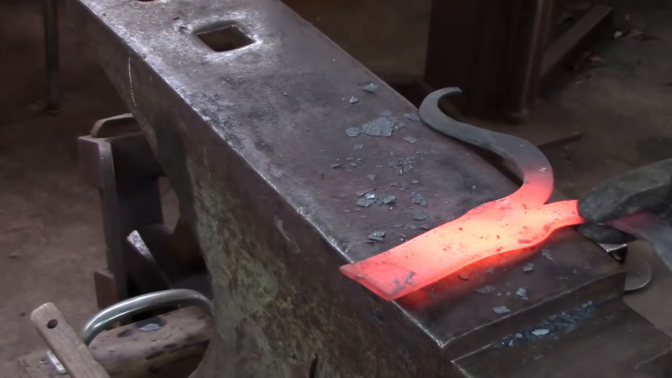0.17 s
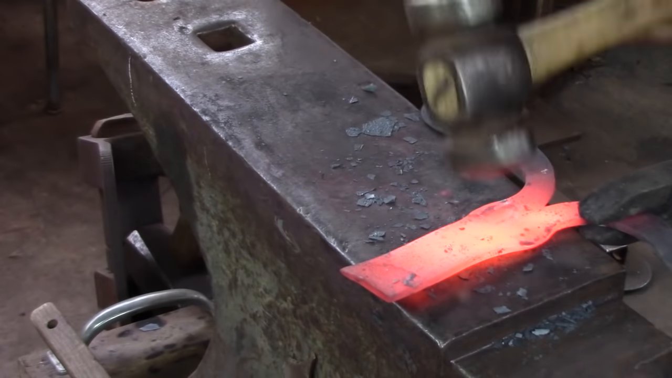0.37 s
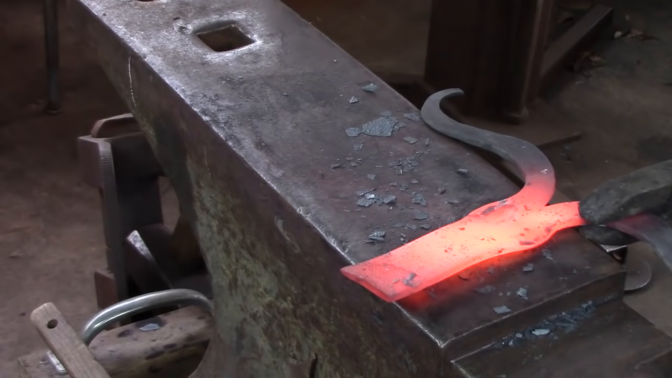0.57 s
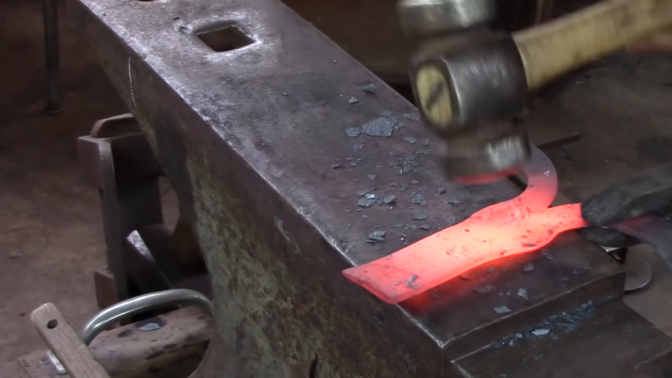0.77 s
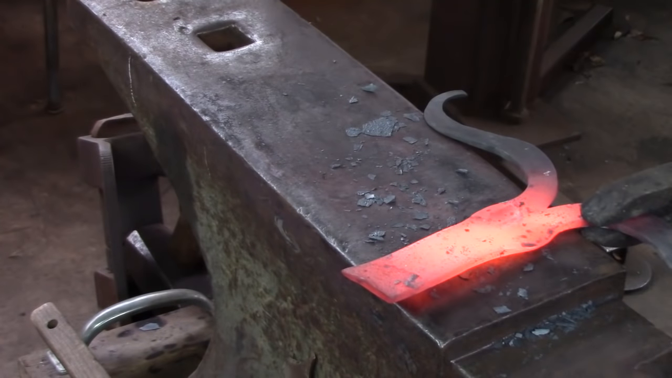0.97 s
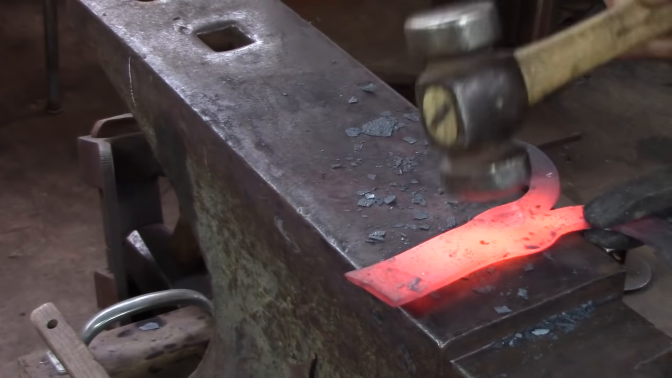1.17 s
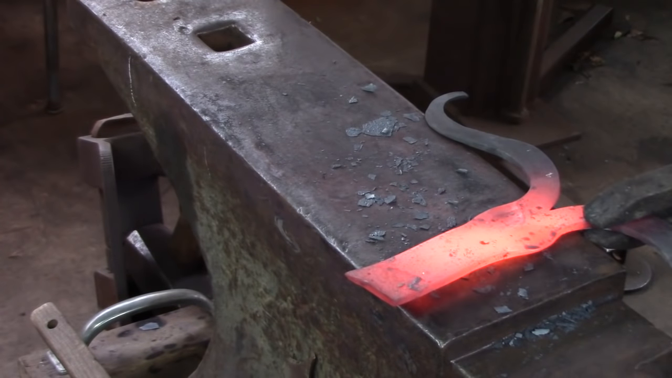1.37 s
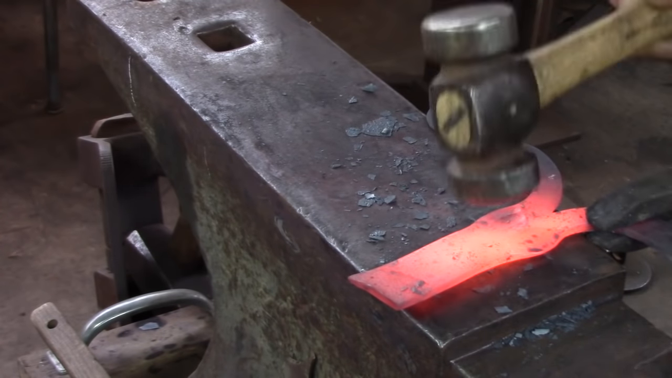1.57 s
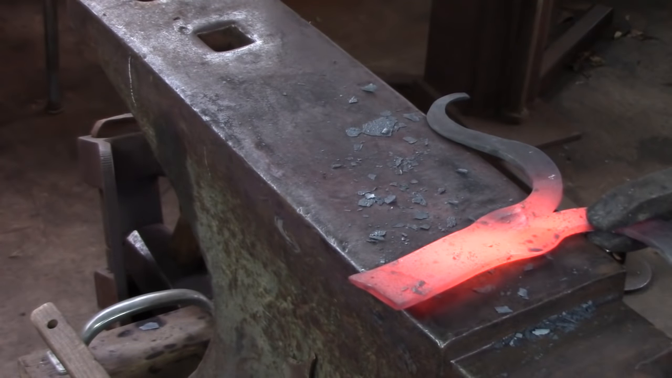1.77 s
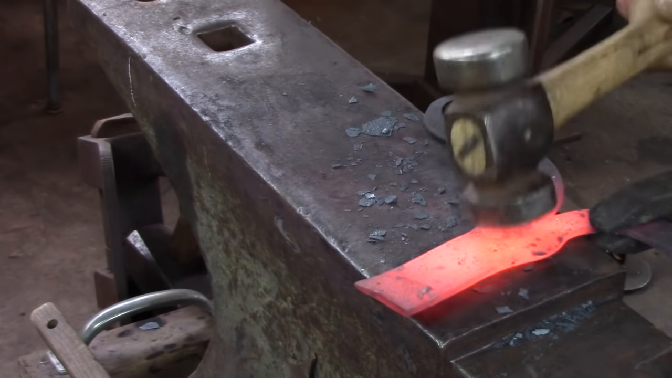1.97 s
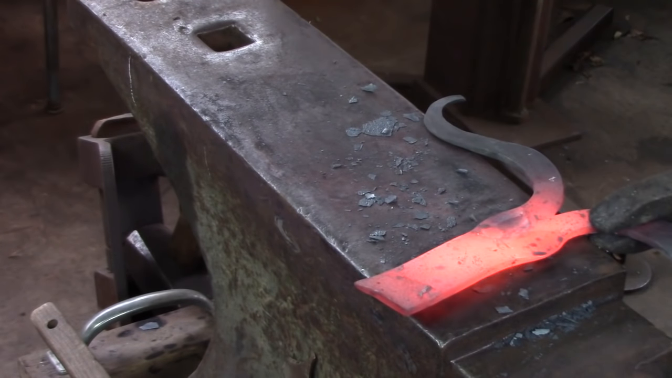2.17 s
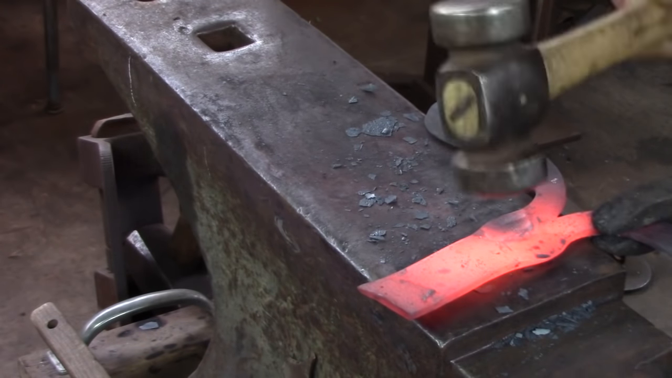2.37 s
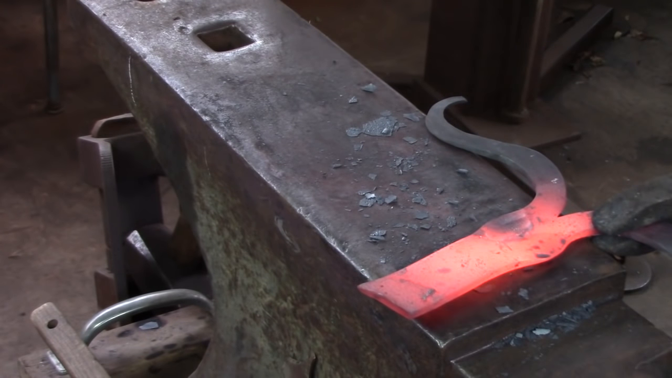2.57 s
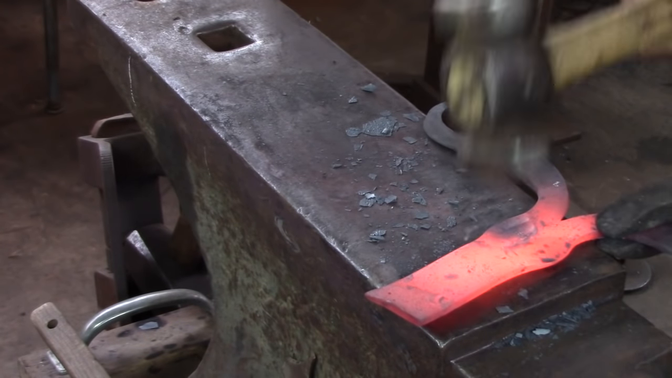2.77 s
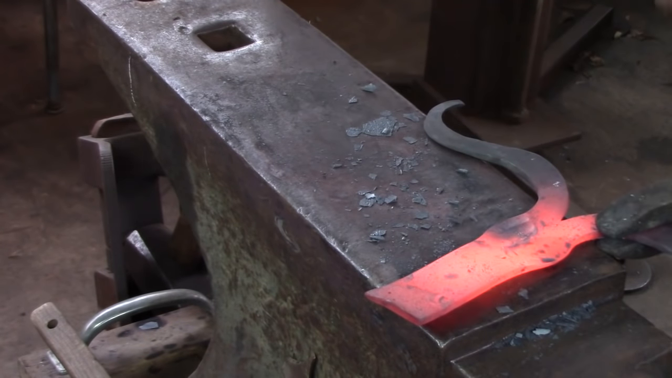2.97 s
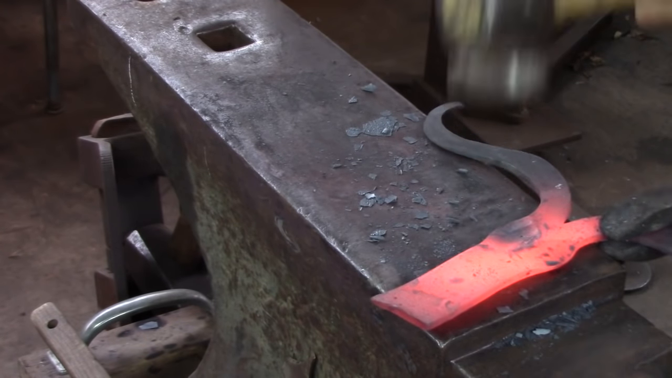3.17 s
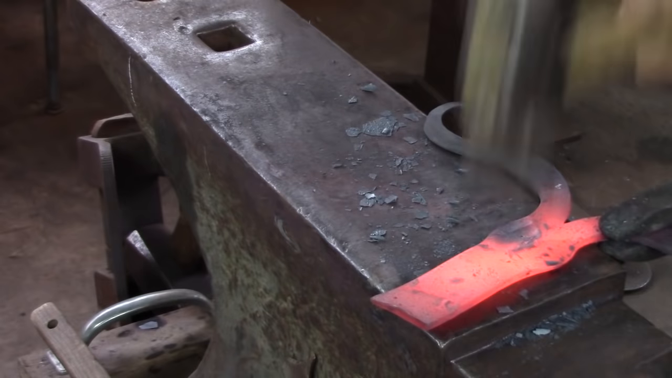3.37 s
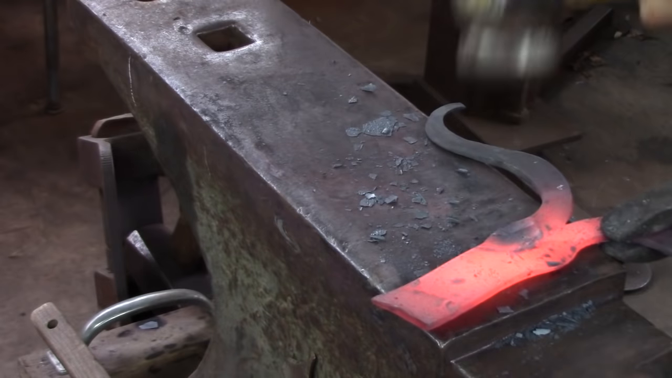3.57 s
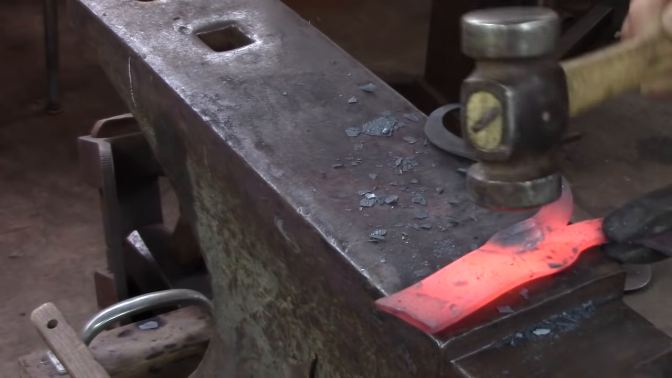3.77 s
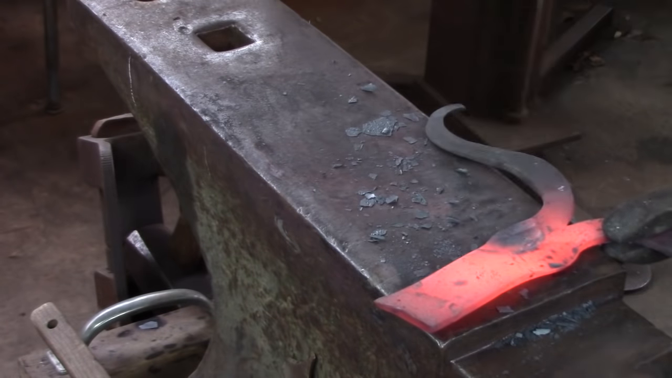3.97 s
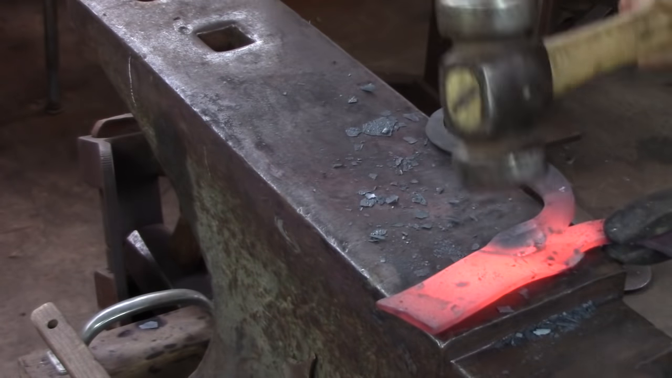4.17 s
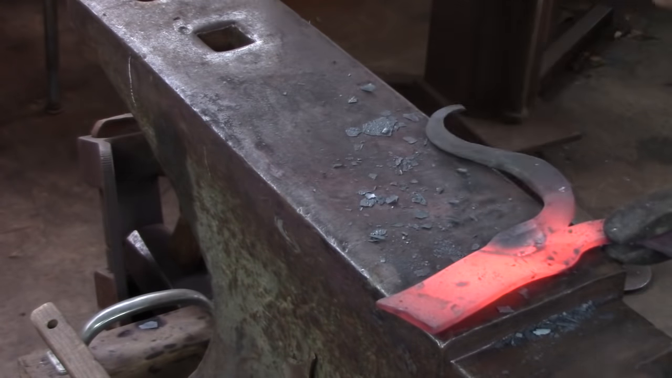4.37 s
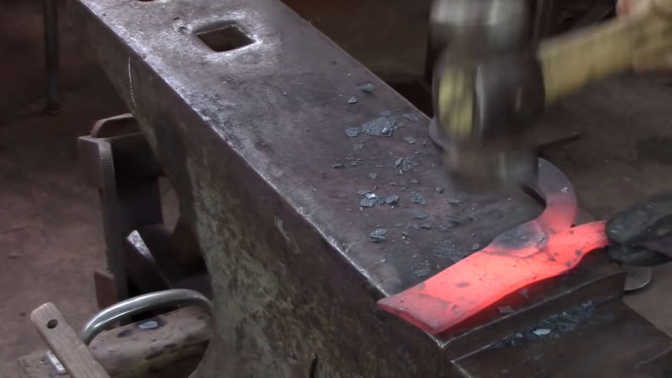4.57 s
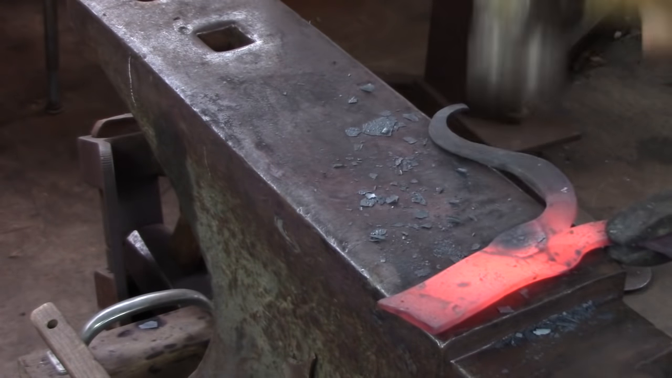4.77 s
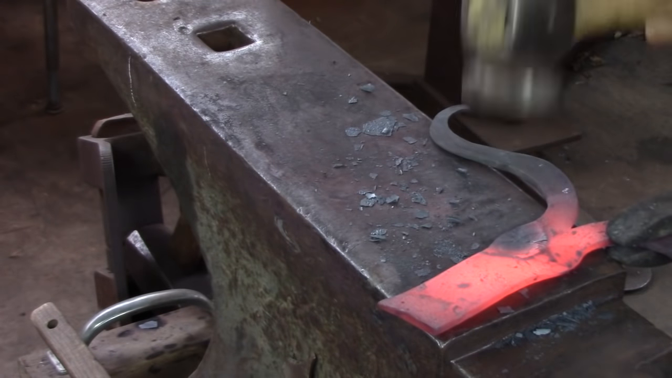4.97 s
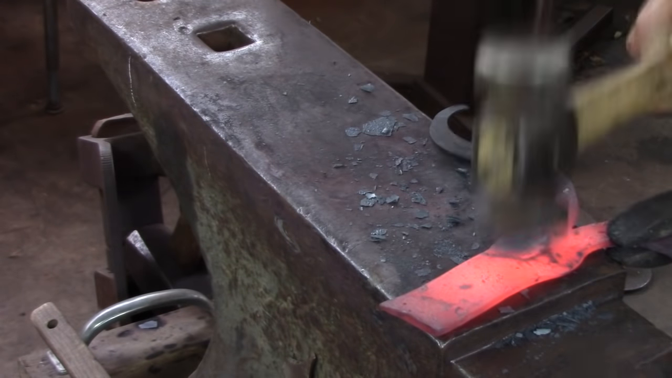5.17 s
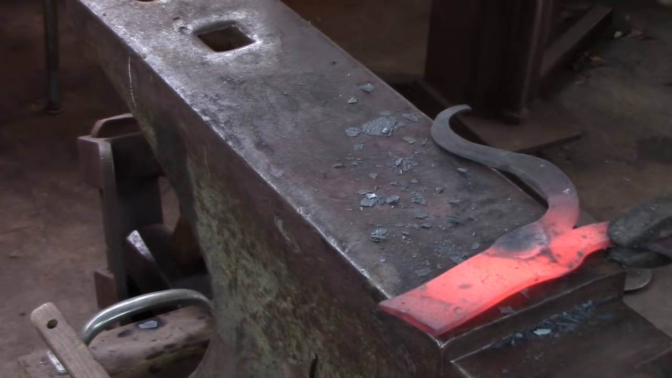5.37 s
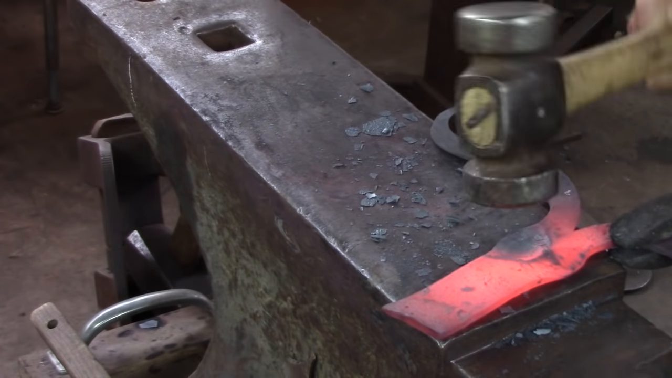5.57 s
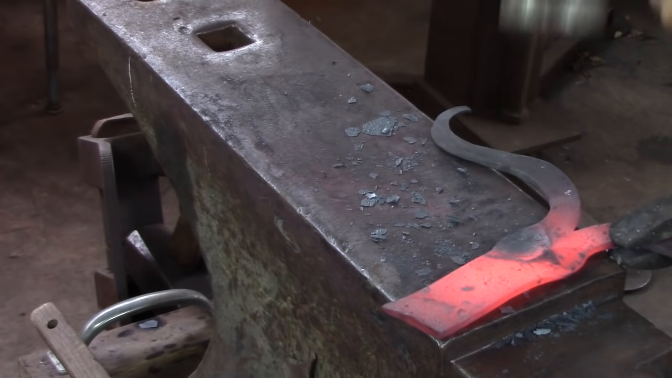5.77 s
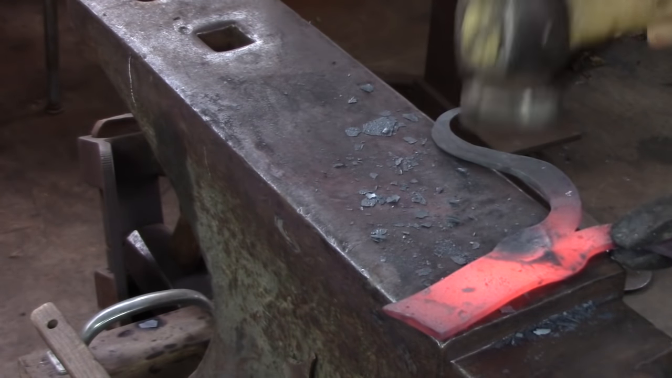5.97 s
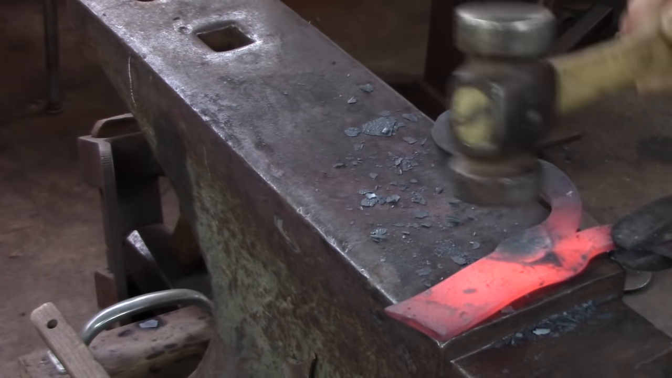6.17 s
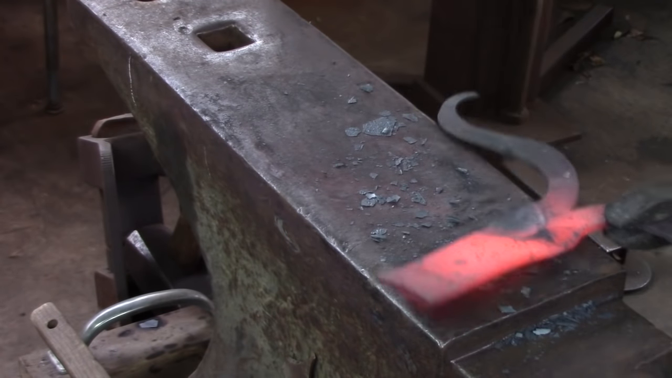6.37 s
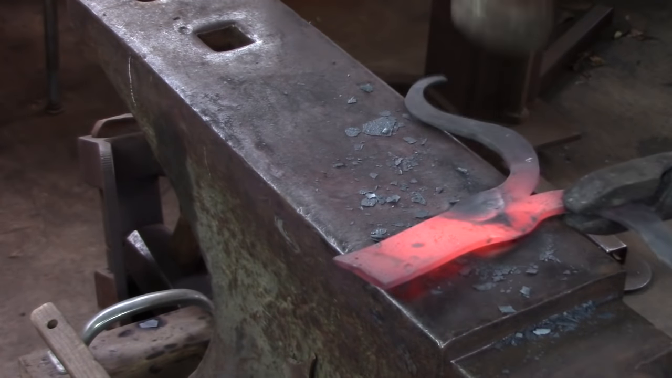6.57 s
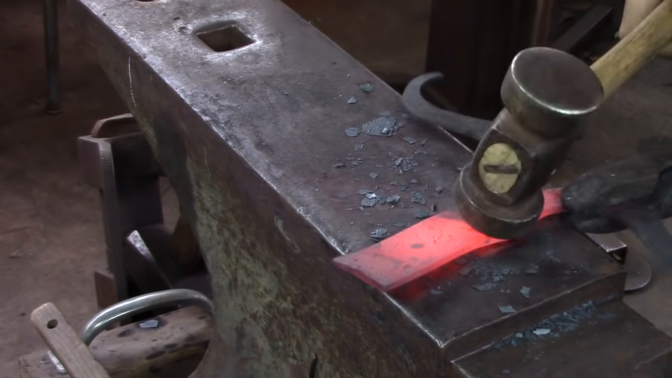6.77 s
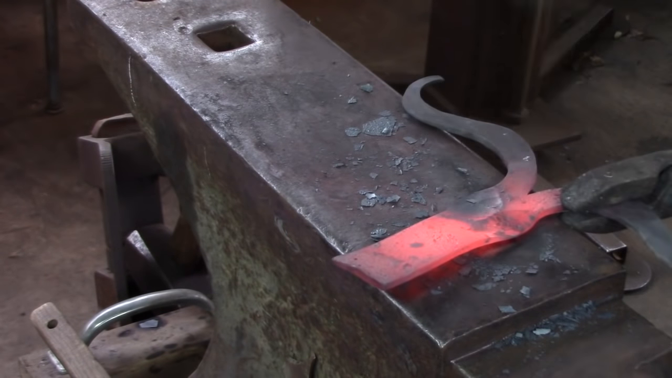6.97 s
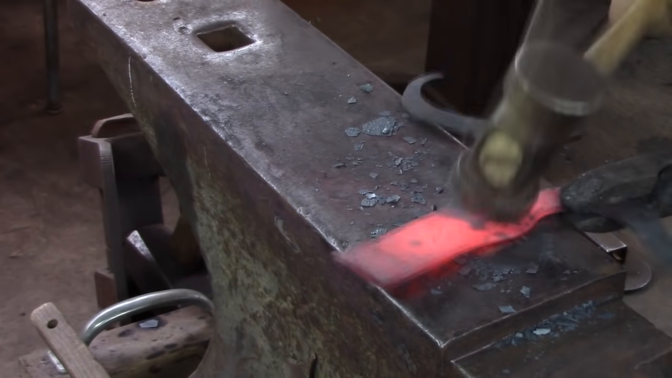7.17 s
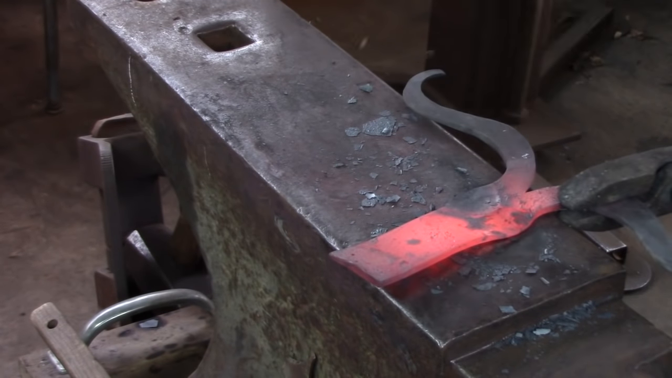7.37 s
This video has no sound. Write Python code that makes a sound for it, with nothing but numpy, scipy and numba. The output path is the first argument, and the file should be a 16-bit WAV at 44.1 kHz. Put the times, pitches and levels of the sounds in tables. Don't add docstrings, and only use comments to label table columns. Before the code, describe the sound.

Seventeen even metallic blows, slightly quickening, ring out from an anvil: sharp crack, damped clank, glassy high whine from the hammer head, and a short room echo. Then the beat breaks off; a faint gritty drag, a bright knock and a tiny creak follow, then a last strike. The microphone is close, the loud hits squashed and slightly clipped, over a very quiet, low room noise.

```python
import sys
import numpy as np
from scipy import signal
from scipy.fft import rfft, irfft
from scipy.io import wavfile
from numba import njit

SR = 44100
rng = np.random.default_rng(int(sys.argv[2]) if len(sys.argv) > 2 else 0)


def put_to_file(sound):
    columns = np.atleast_2d(sound).T
    safe = np.clip(columns, -1, 1)
    whole_steps = np.round(safe * 32767)
    wavfile.write(sys.argv[1], SR, whole_steps.astype(np.int16))


def amplitude_ratio(level_db):
    exponent = np.asarray(level_db, float) / 20
    return 10 ** exponent


N = 327663
LEAD = SR // 2
USUAL_LOW_DB, USUAL_MIDDLE_DB = -43, -45


def rms_one(x):
    return x / np.sqrt(np.mean(x ** 2) + 1e-20)


def at_hz(points, hz):
    curve_hz, value = np.transpose(points)
    return np.interp(np.log(hz + 1), np.log(curve_hz), value)


def dying_sine(t, hz, t60):
    return np.sin(2 * np.pi * hz * t) * amplitude_ratio(-60 * t / t60)


def add(out, s, sound):
    i = LEAD + round(s * SR)
    out[i:i + len(sound)] += sound[:len(out) - i]


def causal_pulse(spectrum, size):
    hz = np.fft.rfftfreq(size, 1 / SR)
    cepstrum = irfft(np.log(amplitude_ratio(at_hz(spectrum, hz))), size)
    cepstrum[1:size // 2] *= 2
    cepstrum[size // 2 + 1:] = 0
    return rms_one(irfft(np.exp(rfft(cepstrum)), size)) / np.sqrt(size)


def workshop_floor():
    # pitch_hz [Hz], density_db [dB per Hz]
    floor_curve = [(40, -29), (120, -4), (250, -7.5), (500, -3), (900, -1.5), (2000, -8.5), (4000, -15.5),
                   (8000, -23), (11500, -27.5), (16000, -43.5)]
    density_db = at_hz(floor_curve, np.fft.rfftfreq(N, 1 / SR))
    noise = irfft(rfft(rng.standard_normal(N)) * amplitude_ratio(density_db), N)
    return amplitude_ratio(-75) * rms_one(noise)


def shop(x):
    # pitch_hz [Hz], t60_s [s]
    wall_decay = [(150, 0.41), (500, 0.47), (1500, 0.24), (4000, 0.2), (8000, 0.17), (15000, 0.18)]
    far_t60_ratio, far_db = 2.86, -33.5
    t = np.arange(SR) / SR
    band_edges_hz = 80 * 2 ** np.arange(0, 8.1, .5)
    white = rng.standard_normal((2, SR))
    tail = 0
    for k, (low, high) in enumerate(zip(band_edges_hz, band_edges_hz[1:])):
        band = signal.sosfilt(signal.butter(2, [low, high], "band", fs=SR, output="sos"), white[k % 2])
        t60 = at_hz(wall_decay, np.sqrt(low * high))
        near = amplitude_ratio(-60 * t / t60)
        far = amplitude_ratio(far_db - 60 * t / t60 / far_t60_ratio)
        tail = tail + band * (near + far)
    tail = tail * np.clip(t / 0.0072, 0, 1)
    return signal.fftconvolve(x, tail / np.sqrt(np.sum(tail ** 2)))[:len(x)]


def touch_rows():
    # start_s [s], level_db [dB], pitch_hz [Hz]
    tick_events = [(.042, -67, 10500), (.078, -68, 10000), (.11, -61, 10100), (.123, -69, 11500),
                   (.135, -72, 11000), (.141, -68, 10000), (.174, -69, 9000), (.18, -55, 6000),
                   (.186, -63, 9000), (2.273, -61, 8800), (2.69, -57, 13100), (6.63, -49, 10500),
                   (6.695, -69, 12000), (6.817, -40, 11100), (6.833, -58, 12000), (6.87, -62, 13000)]
    # pitch_hz [Hz], width_hz [Hz], level_db [dB]
    bar_body = [(290, 190, -8), (800, 600, -17), (1880, 2800, 8.5), (3800, 2400, -2.5), (6500, 590, 6.5),
                (11200, 1700, -3)]
    # start_s [s], level_db [dB], loss above the body [dB per octave], tongs_db [dB]
    knock_events = [
        (6.6105, -49, 24, -50),
        (6.7686, -26, 0.1, -41),
        (6.822, -39, 10, -62),
    ]
    body_hz, burst_s = 1900, .0005
    bass_loss_share = 0.061
    tongs_hz, tongs_width_hz = 1718, 24

    rows = [(s, level, hz, 0.52 * hz, 0.0013) for s, level, hz in tick_events]
    for s, level, loss, tongs_db in knock_events:
        for hz, width, part_db in bar_body:
            octaves_up = np.log2(hz / body_hz)
            lost_db = loss * max(octaves_up, -bass_loss_share * octaves_up)
            rows.append((s, level + part_db - lost_db, hz, width, burst_s))
        rows.append((s, tongs_db, tongs_hz, tongs_width_hz, burst_s))
    return rows


def taps():
    out, t = np.zeros(N + LEAD), np.arange(SR // 8) / SR
    for s, level, hz, width, burst_s in touch_rows():
        r = np.exp(-np.pi * width / SR)
        burst = rng.standard_normal(len(t)) * np.exp(-t / burst_s)
        tap = signal.lfilter([1, 0, -1], [1, -2 * r * np.cos(2 * np.pi * hz / SR), r * r], burst)
        add(out, s, amplitude_ratio(level) * tap / np.abs(tap).max())
    return out


def bar_drag():
    # time_s [s], level_db [dB]
    drag_curve = [
        (6.33, -82),
        (6.438, -65),
        (6.5, -68),
        (6.62, -70),
        (6.682, -85),
        (6.72, -93),
    ]
    out = np.zeros(N + LEAD)
    grit = rng.standard_normal(N) * amplitude_ratio(2.0 * rng.exponential(1, N))
    grit = signal.sosfilt(signal.butter(1, [2500, 13000], "band", fs=SR, output="sos"), grit)
    level_db = np.interp(np.arange(N) / SR, *np.transpose(drag_curve), -140, -140)
    add(out, 0, rms_one(grit) * amplitude_ratio(level_db))
    return out


def tong_creak():
    # time_s [s], level_db [dB]
    creak_span = [
        (7.058, -64),
        (7.15, -66),
    ]
    slips_per_s = 135
    out, t = np.zeros(N + LEAD), np.arange(SR // 20) / SR
    slip = dying_sine(t, 3250, .018) + dying_sine(t, 6300, .004) + dying_sine(t, 3900, .003)
    slip *= 1 - np.exp(-t / .0005)
    for k, (late, strength) in enumerate(rng.standard_normal((13, 2))):
        s = creak_span[0][0] + (k + 0.095 * late) / slips_per_s
        level_db = np.interp(s, *np.transpose(creak_span), right=-140) + 2 * strength
        add(out, s, amplitude_ratio(level_db) * slip)
    return out


def with_pair(blows):
    rows = []
    for s, level, low, middle, clank in blows:
        pair = -57 + 0.6 * (low - USUAL_LOW_DB) + .75 * (middle - USUAL_MIDDLE_DB) - .2 * clank
        rows.append((s, level, low, middle, pair, clank))
    return rows


def hammer_head(blows):
    # pitch_hz [Hz], level_db [dB], t60_s [s], index of the tone's level in a blow
    head_tones = [
        (5523.5, 16, .66, 2),
        (11119.5, 18, .57, 3),
        (15014, 16, .62, 4),
        (15439, 10, .7, 4),
    ]
    out = np.zeros(N + LEAD)
    stops = [blow[0] for blow in blows[1:]] + [N / SR]
    for blow, stop in zip(blows, stops):
        t = np.arange(round((stop - blow[0]) * SR)) / SR
        for hz, level, t60, k in head_tones:
            add(out, blow[0], amplitude_ratio(blow[int(k)] + level) * dying_sine(t, hz, t60))
    return out


def contact_cracks(blows):
    # pitch_hz [Hz], density_db [dB per Hz]
    crack_curve = [(180, -55.5), (280, -20.5), (400, -23), (600, -18.5), (1000, -13), (1700, 0.5),
                   (2400, -1.5), (3400, 2.5), (4500, -5.5), (5300, -13), (6800, -1), (8500, -12),
                   (11500, -12), (15500, -15)]
    crush_db, crush_s = -25, .003
    out, t = np.zeros(N + LEAD), np.arange(1024) / SR
    pulse = causal_pulse(crack_curve, size=1024)
    for s, level, *_ in blows:
        contact = amplitude_ratio(crush_db) * rng.standard_normal(len(t)) * np.exp(-t / crush_s)
        contact[0] = 1
        add(out, s, amplitude_ratio(level) * np.convolve(contact, pulse))
    return out


def anvil_and_bar(blows):
    anvil_hz = [275, 694, 1071, 1460, 1483, 1943, 2083, 2881, 3289, 3510, 3542, 3587, 3686, 3917, 4692]
    bar_hz = [5664, 6330, 6639, 6901, 7030, 7337, 7763, 8619, 9000, 9464, 9927, 11617, 11676, 12931, 13458]
    # level_db [dB], t60_s [s]
    mode_rings = [(-28.5, 0.16), (-28, 0.12), (-15.5, 0.18), (-23, 0.38), (-5.5, 0.14), (-41, 0.49),
                  (-10.5, 0.12), (-2.5, 0.18), (-23, 0.16), (-4, 0.21), (4.5, 0.15), (-1, 0.2), (-14, 0.12),
                  (-1.5, 0.2), (-11.5, 0.21), (-4, 0.19), (-10, 0.2), (-20.5, 0.1), (-8, 0.14),
                  (-6.5, 0.18), (-25, 0.1), (-22, 0.063), (-17.5, 0.19), (-24.5, 0.26), (-17.5, 0.16),
                  (-26.5, 0.12), (-16.5, 0.17), (-22, .11), (-16.5, 0.085), (-18.5, 0.085)]
    spread_db = 2.5
    linger_db, linger_ratio = -41, 3.5
    out, t = np.zeros(N + LEAD), np.arange(SR // 2) / SR
    hz = np.array(anvil_hz + bar_hz)
    mode_db, t60 = np.transpose(mode_rings)

    rings = dying_sine(t, hz[:, None], t60[:, None])
    rings += amplitude_ratio(linger_db) * dying_sine(t, hz[:, None] * 1.0015, t60[:, None] * linger_ratio)

    clank_share = np.zeros(len(hz))
    clank_share[7] = 0.88
    clank_share[9:12] = -.3
    clank_share[13] = 0.1
    bar_share = 0.42 * (hz > 6000)
    for s, level, _, middle, _, clank in blows:
        spot = rng.standard_normal(len(hz))
        sense = np.sign(spot[::-1])
        balance_db = clank_share * clank + bar_share * (middle - USUAL_MIDDLE_DB)
        strength = amplitude_ratio(level + mode_db + balance_db + spread_db * spot)
        add(out, s, (sense * strength) @ rings)
    return out


def scene():
    # start_s [s], strength_db [dB], hammer low_tone_db [dB], middle_tone_db [dB],
    # anvil low clank over high clank clank_db [dB]
    main_blows = [(0.3577, -56.5, -38, -53, 4), (0.7631, -57, -33.5, -52, 5), (1.1555, -57, -37.5, -59, 9),
                  (1.5562, -57, -36, -53.5, 4), (1.9557, -60, -43.5, -48, -2),
                  (2.3544, -56.5, -41, -37.5, 1.5), (2.7372, -56.5, -38, -41.5, 2),
                  (3.1125, -56, -48, -38, 2.5), (3.4599, -59.5, -40, -55, 1),
                  (3.8023, -57.5, -42, -40, -11), (4.1646, -56.5, -44.5, -37, 1.5),
                  (4.5186, -56.5, -36.5, -44, 12.5), (4.8679, -56.5, -44.5, -38.5, 5),
                  (5.2246, -55, -42, -40, -5), (5.573, -56.5, -49, -42.5, -3),
                  (5.8952, -56.5, -42, -43.5, -6), (6.1925, -53.5, -37, -41.5, 4),
                  (7.2306, -56.5, -42.5, -46.5, 10)]
    earlier_blow = [
        (-.45, -43.5, -37.5, -46.5, 0),
    ]
    set_down = [
        (6.7686, -95, -76, -110, 0),
    ]
    blows = with_pair(sorted(earlier_blow + main_blows + set_down))

    touches = taps() + bar_drag()
    head = hammer_head(blows)
    cracks = amplitude_ratio(63) * contact_cracks(blows)
    ringing = amplitude_ratio(43) * anvil_and_bar(blows)
    rings_sent = amplitude_ratio(-9) * ringing + amplitude_ratio(-12) * head
    echo = shop(amplitude_ratio(8.5) * cracks + rings_sent + amplitude_ratio(1.0) * touches)
    dry = head + ringing + cracks + touches + tong_creak() + echo
    return (dry[LEAD:] + workshop_floor())[None]


@njit
def limiter_gain(x, ceiling, attack, release):
    gain, peak, cut = np.ones(len(x)), 0., 0.
    for i in range(len(x)):
        peak = max(abs(x[i]), peak * release)
        cut += attack * (np.log(max(peak / ceiling, 1.)) - cut)
        gain[i] = np.exp(-cut)
    return gain


def top_cut(x):
    return signal.sosfilt(signal.butter(12, 17010, fs=SR, output="sos"), x)


def record(dry):
    x = signal.sosfilt(signal.butter(3, 200, "high", fs=SR, output="sos"), dry[0])
    attack_s, release_db_per_s = 0.0036, -310
    x = x * limiter_gain(x, amplitude_ratio(-23.5), 1 / (attack_s * SR), amplitude_ratio(release_db_per_s / SR))
    top = .082
    x = top * x / (top ** 4 + x ** 4) ** .25
    x = signal.sosfilt(signal.butter(1, 90, "high", fs=SR, output="sos"), x)
    x = signal.sosfilt(signal.ellip(8, .5, 32, 15720, fs=SR, output="sos"), x)
    return top_cut(x[None])


dry = scene()
out = record(dry)
put_to_file(out)
```